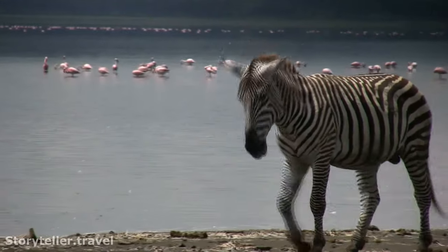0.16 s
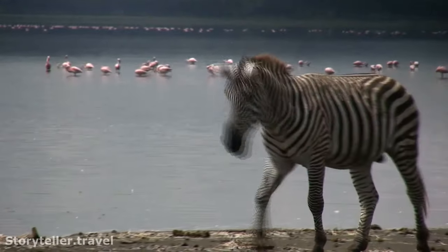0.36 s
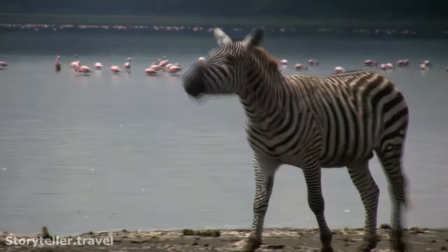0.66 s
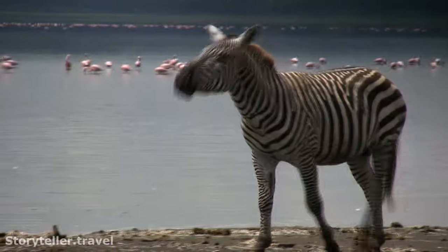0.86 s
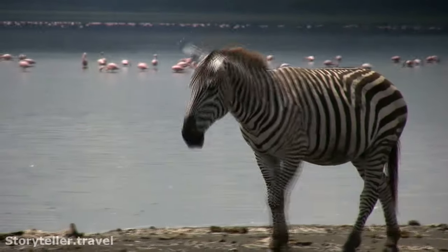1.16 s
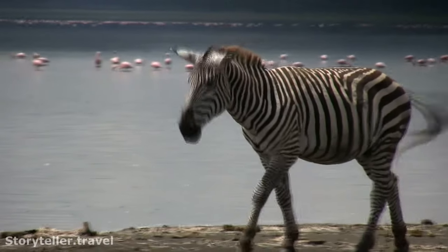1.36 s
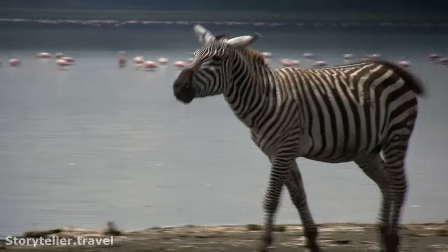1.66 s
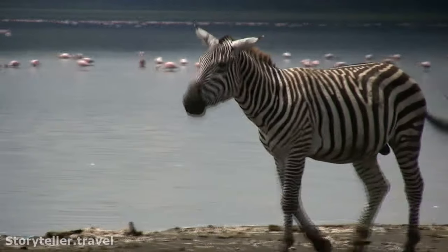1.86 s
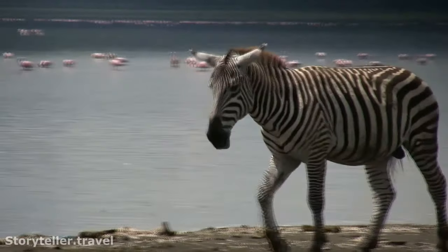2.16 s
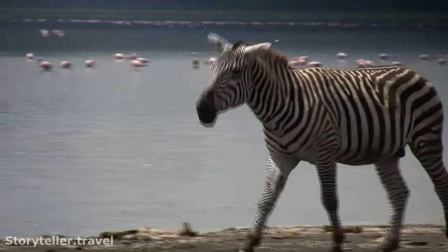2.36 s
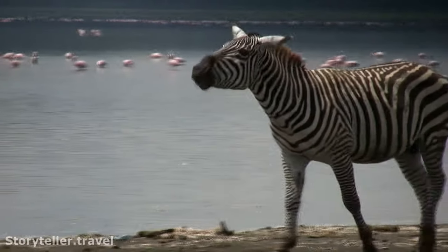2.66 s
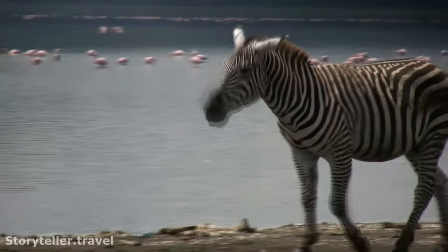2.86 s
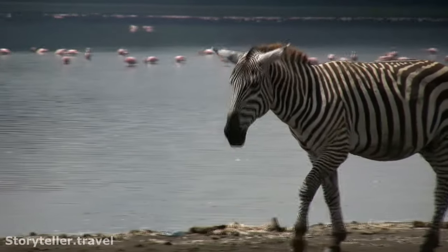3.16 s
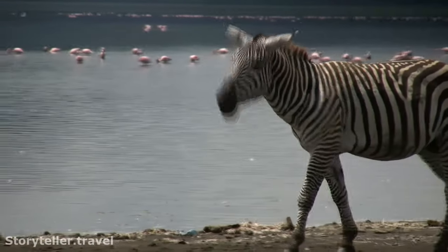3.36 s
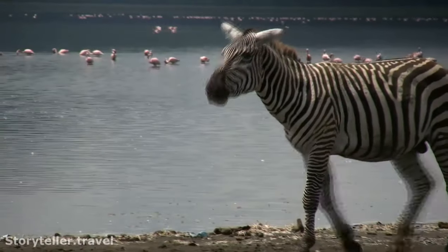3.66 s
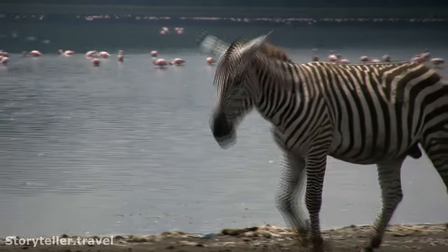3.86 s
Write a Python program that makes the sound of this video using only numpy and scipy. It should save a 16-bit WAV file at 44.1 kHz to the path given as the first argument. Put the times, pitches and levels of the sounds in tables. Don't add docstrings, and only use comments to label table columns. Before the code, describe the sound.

Zebra barking in quick high yaps that break into whistles, outdoors in light wind

```python
import sys
import numpy as np
from scipy import signal
from scipy.fft import rfft, irfft
from scipy.io import wavfile
from scipy.ndimage import uniform_filter1d, minimum_filter1d

SR = 44100
rng = np.random.default_rng(int(sys.argv[2]) if len(sys.argv) > 2 else 0)


def invert_db(x):
    u = np.asarray(x, float) / 20
    return 10 ** u


def int16_out(signal):
    q = np.round(np.clip(np.atleast_2d(signal).T, -1, 1) * 32767)
    wavfile.write(sys.argv[1], SR, q.astype(np.int16))


N = 176400


def curve(t, rows, col):
    rows = np.array(rows, float)
    return np.interp(t, rows[:, 0], rows[:, col])


def unit(x):
    return x / np.sqrt(np.mean(x ** 2))


def walk(rate_hz):
    k = int(SR / rate_hz)
    steps = np.repeat(rng.standard_normal(N // k + 1), k)
    return unit(uniform_filter1d(uniform_filter1d(steps, k), k)[:N])


def coloured(points, flicker_db, rate_hz):
    f = np.maximum(np.arange(N // 2 + 1) * SR / N, 1)
    p = np.array(points, float)
    level_db = np.interp(np.log(f), np.log(p[:, 0]), p[:, 1], left=-90, right=-90)
    full = rfft(rng.standard_normal(N)) * invert_db(level_db)
    half_octave = 2 * np.log2(f)
    first, last = int(2 * np.log2(p[0, 0])), int(2 * np.log2(p[-1, 0])) + 1
    out = np.zeros(N)
    for centre in range(first, last + 1):
        band = irfft(full * np.clip(1 - abs(half_octave - centre), 0, 1), N)
        out += band * invert_db(flicker_db * walk(rate_hz))
    return unit(out)


def hump(t, start, length, edge):
    inside = np.minimum(t - start, start + length - t)
    return np.sin(np.pi / 2 * np.clip(inside / edge, 0, 1)) ** 2


# f/Hz, level/dB per Hz
WIND_SPECTRUM = [(15, -59.5), (25, -27), (75, -4.5), (124, 0.5), (162, -6), (209, -5), (242, -20.5),
                 (320, -14), (420, -31.5), (700, -120)]
# t/s, level/dB
GUST_LEVEL = [(0, -46.5), (.18, -53), (.26, -35.5), (.4, -48), (1.2, -47), (1.6, -52), (2.5, -53),
              (3.3, -50), (4, -59)]


def wind(t):
    return coloured(WIND_SPECTRUM, 3.4, 14) * invert_db(curve(t, GUST_LEVEL, 1))


# f/Hz, level/dB per Hz
AIR_SPECTRUM = [(250, -14), (680, -16.5), (1850, -19.5), (2700, -36), (4000, -43.5), (7900, -48.5),
                (8400, -49), (15700, -59)]


def open_air():
    return invert_db(-54) * coloured(AIR_SPECTRUM, 1.0, 3.3)


def throat_flutter():
    shimmer_db, rasp_db, hoarse_db, broken_db = 1.2, -18.5, -12.5, 2.5
    wobble, grain = walk(120), walk(700)
    base = invert_db(shimmer_db * walk(90)) * (1 + invert_db(rasp_db) * grain)
    over = invert_db(2.5 * walk(120)) * (1 + .3 * walk(900))
    clean = (wobble, base, over)
    broken = (3 * wobble, base * invert_db(broken_db * walk(110)), over)
    harsh = (1.78 * wobble, base + invert_db(hoarse_db) * grain, over)
    thin = (wobble / 2, base, over)
    return clean, broken, harsh, thin


# f/Hz, level/dB
THROAT_GAIN = [(420, -0.5), (520, -4.5), (650, -7), (780, -2), (850, -2), (960, -2.5), (1040, -1.5)]
# f/Hz, level/dB
MOUTH_GAIN = [(1100, -19), (1500, -14.5), (1800, -23), (2100, -11.5), (2350, -23.5), (2600, -18),
              (3050, -32), (3450, -32.5)]
# t/s, length/s, octave level/dB, higher overtones level/dB
MOUTH_OPENINGS = [(0.102, .18, -2, 6), (.32, .19, -0.5, 4), (0.784, .17, 0.5, 3.5), (0.996, .19, 1, 3),
                  (1.25, .18, 1, 3), (1.744, .16, 2.5, 2), (1.947, .2, 2.5, 1.5), (2.19, .2, -2.5, -10.5),
                  (2.737, .11, 9.5, -11), (2.86, .17, -8, 3), (3.067, .18, -5, 3.5), (3.46, .16, -6.5, 1.5),
                  (3.637, .06, -10.5, -6), (3.682, .1, -5, 3), (3.833, .17, -6, 0.5)]


def note(t, start, length, hz, db, over_db, rough):
    jitter, fade_s, release_s = .005, 0.0043, 0.012
    order_db, effort_share = -5.5, 1.8
    mouth_top_hz, mouth_roll_db_per_khz = 4120, -30
    wobble, base_gain, over_gain = rough
    s = slice(int(start * SR), min(int((start + length + release_s) * SR), N))
    u = t[s] - start
    f = hz(u) * (1 + jitter * wobble[s])
    phase = 2 * np.pi * np.cumsum(f) / SR
    mouth = np.array(MOUTH_GAIN, float)
    octave_db, high_db = sum(np.outer(d, hump(t[s], a, n, .01)) for a, n, *d in MOUTH_OPENINGS)
    effort_db = order_db + effort_share * curve(f, THROAT_GAIN, 1)
    over = np.zeros(len(u))
    for k in range(2, 6):
        level_db = octave_db if k == 2 else high_db
        level_db = level_db + np.interp(np.log(k * f), np.log(mouth[:, 0]), mouth[:, 1])
        level_db = level_db + effort_db * (k - 2)
        level_db = level_db + mouth_roll_db_per_khz * np.maximum(k * f - mouth_top_hz, 0) / 1e3
        flicker = np.roll(over_gain, k * SR // 3)[s]
        over += invert_db(level_db) * flicker * np.sin(k * phase + k)
    attack = hump(u, 0, 1, 2 * fade_s)
    release = hump(u, -1, 1 + length + release_s / 2, release_s)
    out = np.zeros(N)
    voice = np.sin(phase) + invert_db(over_db(u)) * over
    out[s] = np.sqrt(2) * invert_db(db(u)) * attack * release * base_gain[s] * voice
    return out


def traced_notes(t, tracks, over_db, rough):
    out = np.zeros(N)
    for rows in tracks:
        s = rows[0][0]
        hz = lambda u: uniform_filter1d(curve(u + s, rows, 1), size=200)
        db = lambda u: curve(u + s, rows, 2)
        out += note(t, s, rows[-1][0] - s, hz, db, lambda u: over_db, rough)
    return out


# t/s, length/s, from f/Hz, to f/Hz, level/dB
CHEST_SWOOPS = [(0.11, 0.05, 520, 823, -27.5), (0.323, 0.069, 479, 864, -23.5),
                (0.786, 0.053, 520, 837.5, -18), (1.002, 0.065, 441.5, 865.6, -16.5),
                (1.255, 0.064, 470.6, 874, -21.5), (1.75, 0.05, 492, 853, -22),
                (1.944, 0.09, 424, 870, -22), (2.204, 0.074, 423.3, 885, -23.5),
                (2.713, 0.043, 568, 850, -18), (2.863, 0.053, 562, 842.5, -17),
                (3.075, 0.06, 473.4, 893, -15.5), (3.466, 0.047, 597, 860, -16)]


def chest_barks(t, rough):
    rise_bend, rise_share = 1.35, .85
    out = np.zeros(N)
    for s, n, a, b, level in CHEST_SWOOPS:
        rise = lambda u: np.sin(np.pi / 2 * np.clip(u / n / rise_share, 0, 1)) ** rise_bend
        hz = lambda u: a + (b - a) * rise(u)
        db = lambda u: level + curve(hz(u), THROAT_GAIN, 1)
        out += note(t, s, n, hz, db, lambda u: -6.0 * (1 - u / n), rough)
    return out


# f/Hz, width/Hz, level/dB
CAVITIES = [(850, 140, -3.5), (520, 68, -15.5)]


def throat_cavities(voice):
    return sum(invert_db(db) * signal.lfilter(*signal.iirpeak(hz, hz / w, SR), voice) for hz, w, db in CAVITIES)


# f/Hz, level/dB per Hz
NASAL_SPECTRUM = [(400, -11.5), (800, -2), (1200, -6), (1500, -3), (2100, 0.5), (2480, -9), (2680, -31.5),
                  (4000, -42)]
# f/Hz, level/dB per Hz
HISS_SPECTRUM = [(2300, -8), (2700, 6.5), (3200, 1.5), (3900, -7.5), (4600, -14), (5200, -31)]


def breath_leak(voice):
    breath_db, hiss_db, flicker_db = -28.5, -44, 5
    leak = invert_db(breath_db) * coloured(NASAL_SPECTRUM, flicker_db, 40)
    leak = leak + invert_db(hiss_db) * coloured(HISS_SPECTRUM, flicker_db, 64)
    return uniform_filter1d(abs(voice), size=400) * leak


def shore(x):
    echo_db, echo_start_s, echo_t60_s, echo_density = -13.5, 0.011, 0.2, .01
    slap_s, slap_db, slap_low_hz = .052, -23, 1000
    u = np.arange(SR // 2) / SR
    chance = rng.random((2, len(u)))
    taps = (chance[0] < echo_density) * (chance[1] - .5)
    taps = taps * invert_db(-60 * u / echo_t60_s) * np.clip(u / echo_start_s, 0, 1) ** 2
    taps = taps / np.sqrt(np.sum(taps ** 2))
    highpass = signal.butter(4, slap_low_hz, "high", fs=SR, output="sos")
    bank = invert_db(slap_db) * np.roll(signal.sosfilt(highpass, x), int(slap_s * SR))
    return x + bank + invert_db(echo_db) * signal.fftconvolve(x, taps)[:N]


# t/s, length/s, level/dB
TOOTH_PUFFS = [
    (0.129, 0.054, -61),
    (0.424, 0.04, -60.5),
    (.81, 0.1, -58.5),
    (1.776, .04, -70),
    (3.68, 0.059, -53.5),
    (3.845, .055, -51.5),
]


def tooth_puffs(t):
    level = sum(invert_db(db) * hump(t, s, n, .3 * n) for s, n, db in TOOTH_PUFFS)
    return coloured(HISS_SPECTRUM, 4.2, 90) * level


# t/s, length/s, top f/Hz, first level/dB, last level/dB
WHISTLE_NOTES = [(0.16, 0.1, 1124, -30, -35.5), (0.387, 0.106, 1134, -28, -29.5),
                 (0.838, 0.12, 1124, -20.5, -30.5), (1.063, 0.13, 1132, -24.5, -34.5),
                 (1.312, 0.11, 1143, -28, -38.5), (1.801, 0.092, 1121, -25, -36.5),
                 (2.033, 0.12, 1122, -28.5, -36), (2.272, 0.099, 1124, -22.5, -37.5),
                 (2.75, 0.059, 1058, -34, -21.5), (2.915, 0.093, 1179, -14, -21),
                 (3.133, 0.1, 1217, -10.5, -29.5), (3.511, 0.089, 1174, -12, -26),
                 (3.721, 0.056, 1181, -18, -17), (3.879, 0.076, 1044, -20, -29),
                 (3.95, 0.034, 1070, -52, -29.5)]


def whistles(t, rough):
    break_share, settle_s, dull_s = .87, .022, 0.037
    out = np.zeros(N)
    for s, n, top, a, b in WHISTLE_NOTES:
        hz = lambda u: top * (1 - (1 - break_share) * np.exp(-u / settle_s))
        db = lambda u: a + (b - a) * u / n + curve(hz(u), THROAT_GAIN, 1)
        out += note(t, s, n, hz, db, lambda u: 4.0 - 10 * u / dull_s, rough)
    return out


# t/s, f/Hz, level/dB
INHALE_TRACKS = [
    [(.245, 936, -52.5), (.265, 540, -41.5), (.32, 387, -41)],
    [(.928, 880, -37), (.945, 520, -33.5), (.962, 369, -33.5), (.995, 427, -40.5)],
    [(1.165, 846, -52.5), (1.185, 765, -45.5), (1.205, 600, -49.5)],
    [(1.882, 1085, -45), (1.92, 430.4, -33.5), (1.94, 418, -31)],
    [(2.098, 1110, -43.5), (2.118, 879, -25), (2.15, 422.3, -35.5), (2.203, 387, -37)],
    [(2.802, 959.4, -36.5), (2.822, 784, -12), (2.838, 630, -38), (2.853, 529, -23.5), (2.863, 566, -29)],
    [(3.012, 902, -39), (3.055, 421.5, -41), (3.078, 485, -30.5)],
    [(3.738, 929, -11.5), (3.76, 685, -26.5), (3.78, 483, -28.5), (3.83, 463.5, -43)],
    [(3.86, 403, -49), (3.88, 374.5, -37.5), (3.925, 341, -41.5)],
    [(1.548, 790, -44), (1.558, 892, -41.5), (1.6, 813, -63)],
]


def inhale_falls(t, rough):
    return traced_notes(t, INHALE_TRACKS, -8.5, rough)


# middle t/s, length/s, level/dB
BREATH_SWELLS = [(0.461, 0.058, 1.5), (0.492, 0.026, -5.5), (0.863, .025, -1.5), (0.882, 0.032, 5),
                 (0.897, 0.029, -11.5), (1.127, 0.029, -14.5), (1.149, 0.056, 3.5), (1.176, 0.018, -1.5),
                 (1.383, 0.019, 6), (1.762, 0.011, 3.5), (1.8, 0.0093, 7), (1.869, 0.024, -11),
                 (1.88, 0.016, 6), (1.954, 0.028, -3), (1.962, 0.02, 4), (2.015, 0.024, 9),
                 (2.093, 0.022, -15.5), (2.211, 0.012, -2), (2.228, 0.011, 6), (2.275, 0.014, 3),
                 (2.345, .022, -3.5), (2.361, 0.019, 8.5), (2.808, .012, -4.5), (2.881, 0.01, 2.5),
                 (2.898, 0.026, 5.5), (3.086, 0.0052, -10.5), (3.162, .012, -1), (3.19, 0.013, -1.5),
                 (3.206, 0.024, 3), (3.65, .022, 0), (3.663, 0.017, -6), (3.697, 0.032, 10.5),
                 (3.728, 0.012, -7.5), (3.889, .022, 2.5)]


def breath_swells(t):
    return invert_db(sum(db * hump(t, s - n / 2, n, n / 2) for s, n, db in BREATH_SWELLS))


# t/s, length/s, level/dB
GASP_EVENTS = [
    (0.503, 0.22, -44.5),
    (0.932, 0.084, -46),
    (1.413, 0.24, -47.5),
    (1.874, 0.099, -49),
    (2.079, 0.099, -50.5),
    (2.38, 0.29, -46.5),
    (3.25, 0.17, -47),
    (3.631, 0.21, -38),
    (3.847, 0.056, -36.5),
]


def gasps(t):
    level = sum(invert_db(db) * hump(t, s, n, 0.28 * n) for s, n, db in GASP_EVENTS)
    return coloured(NASAL_SPECTRUM, 6.7, 29.48) * level


# t/s, length/s, level/dB, start f/Hz, zigzag rate/Hz
BIRD_TRILLS = [
    (0.985, 0.028, -41, 4480, 80),
    (1.394, .034, -45.5, 4395, 96),
    (1.903, 0.03, -43, 4056, 82),
    (3.614, 0.03, -50, 4375, 110),
]


def bird(t):
    depth_hz, climb_hz_per_s, drift_hz = 1320, 92000, 250
    trough_db, octave_db, grain_db = 6, -33, 4
    echo_db, echo_t60_s = -5, .06
    out, drift = np.zeros(N), walk(400)
    for s, n, db, start_hz, rate_hz in BIRD_TRILLS:
        u = t - s
        swing = np.cos(2 * np.pi * rate_hz * (u - .0015))
        f = start_hz + climb_hz_per_s * np.clip(u, 0, n) + depth_hz * swing + drift_hz * drift
        phase = 2 * np.pi * np.cumsum(f) / SR
        tone = np.sin(phase) + invert_db(octave_db) * np.sin(2 * phase)
        out += invert_db(db - trough_db * swing) * hump(t, s, n, 0.0091) * tone
    out = out * invert_db(grain_db * walk(600))
    u = np.arange(SR // 8) / SR
    leaves = rng.standard_normal(len(u)) * invert_db(-60 * u / echo_t60_s)
    leaves = leaves / np.sqrt(np.sum(leaves ** 2))
    return out + invert_db(echo_db) * signal.fftconvolve(out, leaves)[:N]


# t/s, f/Hz, level/dB
WHINE_TRACKS = [
    [(2.91, 5030, -74), (2.95, 5110, -69), (3.01, 5130, -72)],
    [(3.135, 5040, -75), (3.2, 5130, -72)],
]


def nasal_whines(t, rough):
    return traced_notes(t, WHINE_TRACKS, 0, rough)


# f/Hz, level/dB per Hz
SNORT_SPECTRUM = [(2300, 0), (2600, 6.5), (3000, -8.5), (3800, -11), (4300, -32.5)]


def snort(t):
    start_s, length_s, level_db = 2.968, 0.05, -38.5
    return invert_db(level_db) * hump(t, start_s, length_s, 0.017) * coloured(SNORT_SPECTRUM, 1.7, 53)


# t/s, f/Hz, level/dB
HOARSE_TRACKS = [
    [(3.638, 693, -29.5), (3.655, 850, -22.5), (3.672, 724.3, -12), (3.696, 761, -18), (3.73, 961, -6.5)],
    [(3.836, 734, -40.5), (3.848, 850, -18), (3.858, 779.4, -28.5), (3.876, 786, -8), (3.905, 808, -35.5)],
    [(3.685, 811, -28.5), (3.705, 935, -14), (3.73, 1034, -18.5)],
    [(3.66, 520, -54), (3.68, 496, -19.5), (3.7, 517, -38)],
    [(3.852, 261, -49), (3.862, 244, -35.5), (3.875, 240, -52.5)],
]


def second_zebra(t, rough):
    return traced_notes(t, HOARSE_TRACKS, 0, rough)


def zebras(t):
    clean, broken, harsh, thin = throat_flutter()
    voice = chest_barks(t, clean) + whistles(t, clean) + inhale_falls(t, broken)
    voice = voice + nasal_whines(t, thin) + second_zebra(t, harsh)
    voice = voice * breath_swells(t)
    return voice + breath_leak(voice) + throat_cavities(voice)


def scene():
    t = np.arange(N) / SR
    breath = tooth_puffs(t) + gasps(t) + snort(t)
    return (wind(t) + open_air() + shore(zebras(t)) + breath + bird(t))[None]


def top_cut(x):
    return signal.sosfilt(signal.butter(12, 15740, fs=SR, output="sos"), x)


def record(dry):
    limit, ratio, window_s = .23, 5, .004
    k = int(window_s * SR)
    peak = uniform_filter1d(-minimum_filter1d(-abs(dry), k), k)
    gain = np.minimum(1, limit / np.maximum(peak, 1e-9)) ** (1 - 1 / ratio)
    return top_cut(dry * gain)


dry = scene()
out = record(dry)
int16_out(out)
```